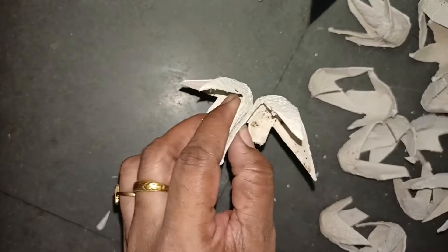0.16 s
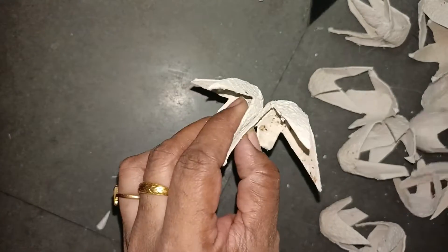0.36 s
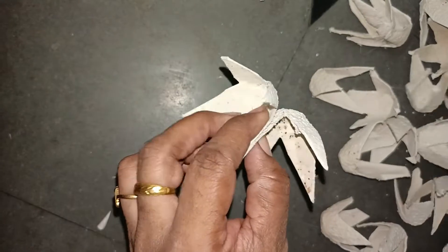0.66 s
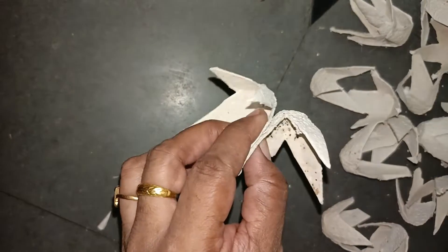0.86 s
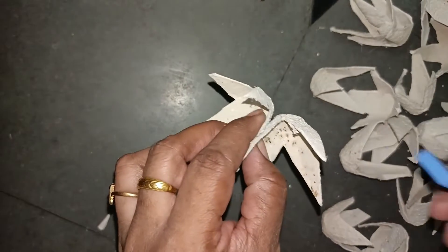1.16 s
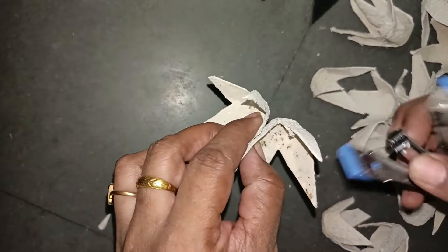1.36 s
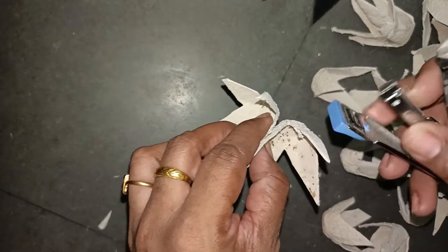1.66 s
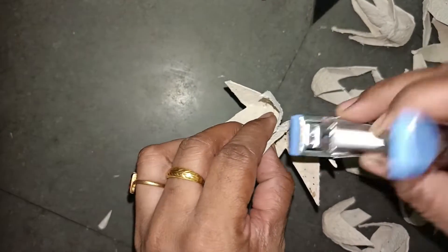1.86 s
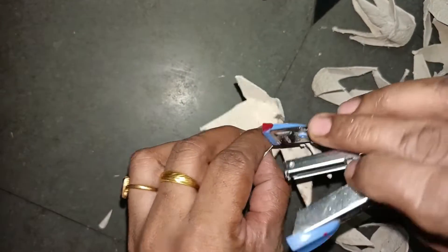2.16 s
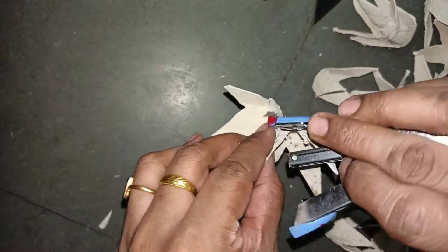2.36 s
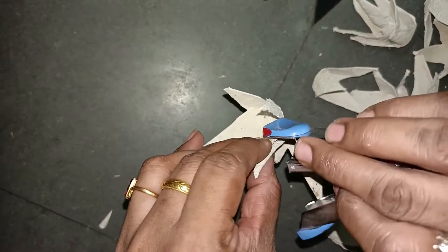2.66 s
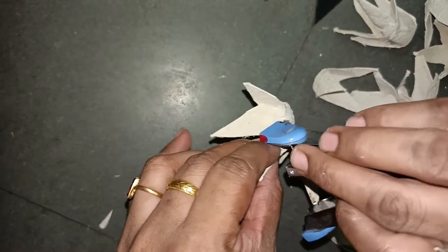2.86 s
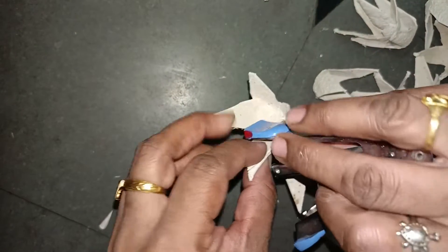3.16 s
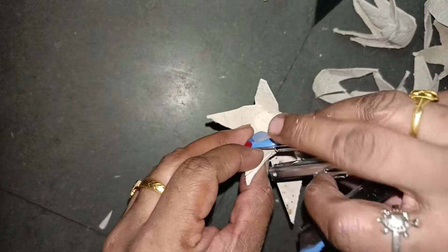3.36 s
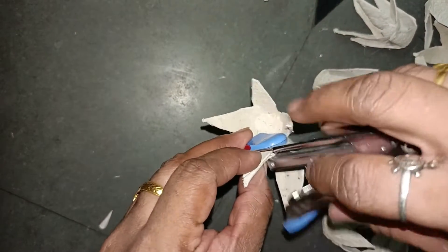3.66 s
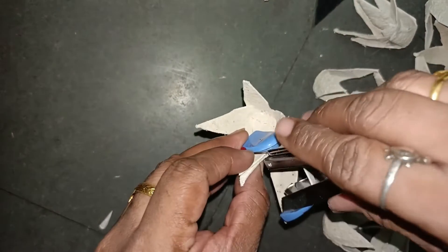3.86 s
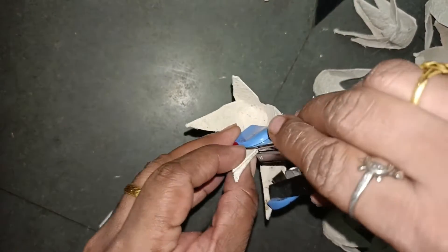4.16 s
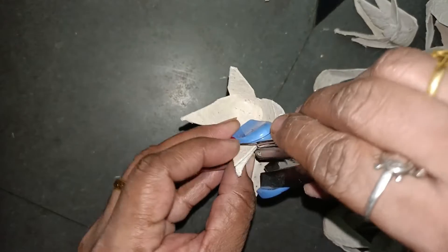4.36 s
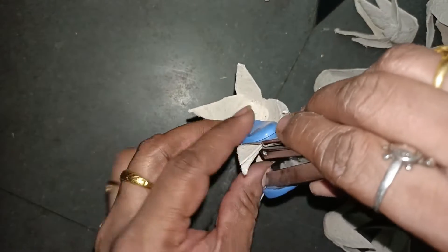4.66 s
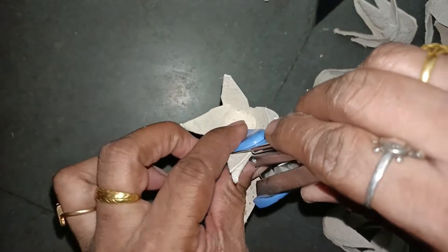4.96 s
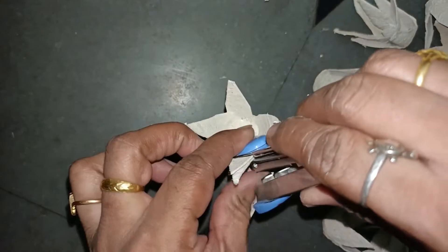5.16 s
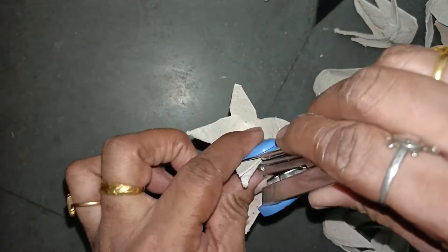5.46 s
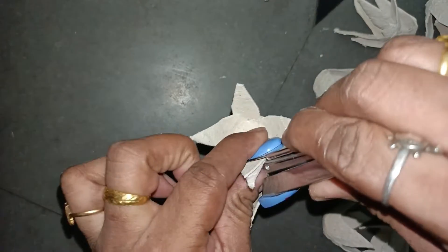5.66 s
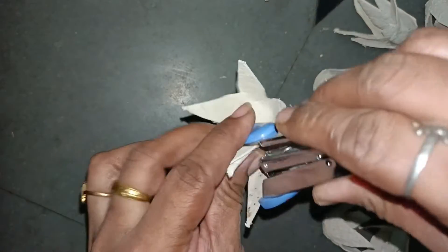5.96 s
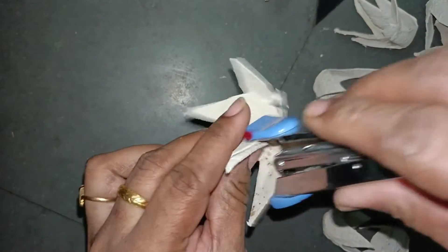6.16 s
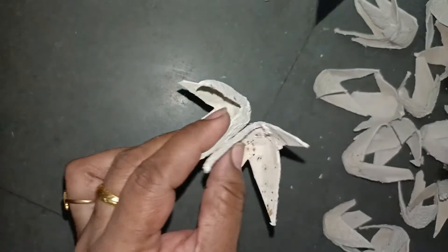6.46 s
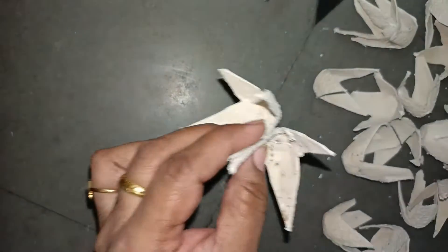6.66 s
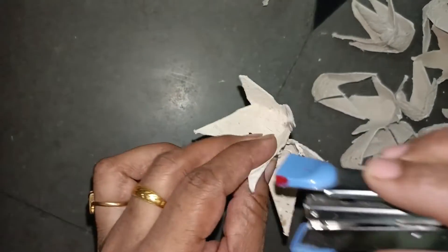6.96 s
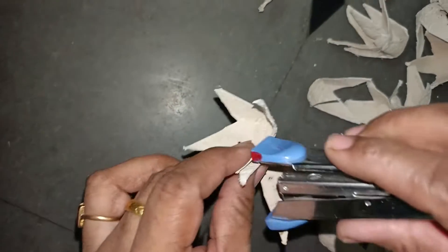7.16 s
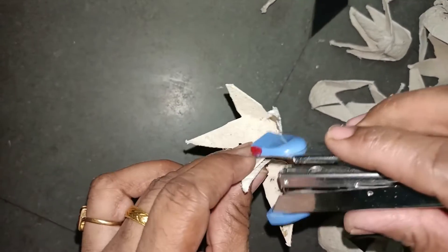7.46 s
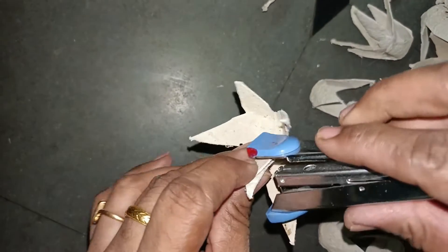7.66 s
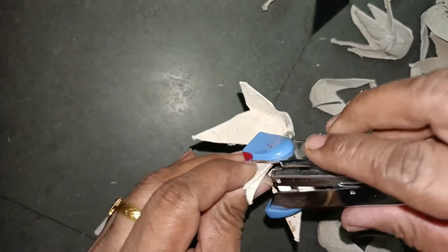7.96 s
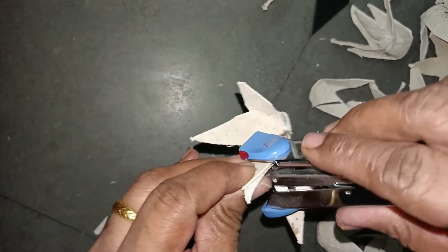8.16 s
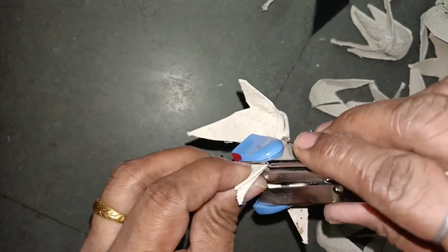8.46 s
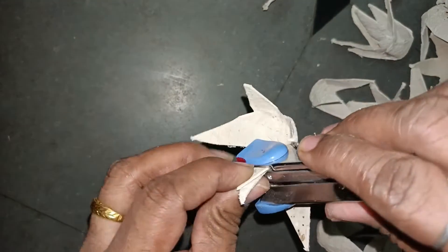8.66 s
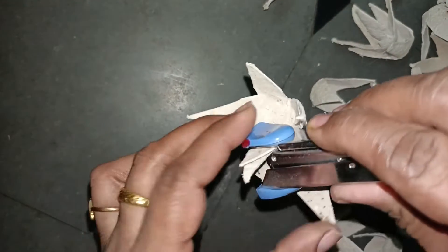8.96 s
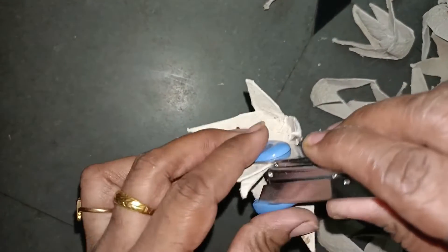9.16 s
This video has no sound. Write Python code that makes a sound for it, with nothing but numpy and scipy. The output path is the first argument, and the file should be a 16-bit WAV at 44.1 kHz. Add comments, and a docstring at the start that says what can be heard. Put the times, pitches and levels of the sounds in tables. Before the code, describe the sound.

Close up in a quiet indoor room, fingers handle dry paper-pulp pieces with soft, crisp rubs and tiny clicks. A hand stapler snaps open at the start, clinks as it is picked up, and later drives a single staple with a sharp metallic crack. Near the end its jaw slides over the pulp with a thin, bright hiss and clicks again. A far clock and a low appliance hum are barely audible behind.

```python
"""Dry paper-pulp petals are joined with a small metal hand stapler, close by in a quiet, hard room.
First the stapler springs open with a snap: steel strikes steel and the frame rings. Its loose parts rattle
as it is picked up and slid over the pulp. Near 5.5 s it drives a staple with one sharp crack, and from
about 7.5 s its jaw creeps on with a bright hiss. Throughout, fingers rub the pulp and its edges click,
while far off a clock ticks each second and an appliance hums."""
import sys
import numpy as np
from scipy import signal
from scipy.fft import rfft, irfft, next_fast_len
from scipy.io import wavfile
from scipy.ndimage import uniform_filter1d

SR = 44100
rng = np.random.default_rng(int(sys.argv[2]) if len(sys.argv) > 2 else 0)


def unload_audio(sound):
    """Save the sound as a 16-bit wav file, at the path given as the first command line argument."""
    columns = np.transpose(np.atleast_2d(sound))
    # keep every value between -1 and 1, then stretch to whole-number steps
    steps = np.round(np.clip(columns, -1, 1) * 32767)
    wavfile.write(sys.argv[1], SR, steps.astype(np.int16))


N = 410571
TIME = np.arange(N) / SR
BURST = np.arange(4096) / SR   # time axis of one impact, s


def spring_snap():
    """Release of stored elastic energy: the stapler springs open and its frame vibrates freely."""
    # Collisions within the snap. Each row: start in seconds, level in dB, 60 dB decay time in seconds.
    hits = [(.3261, -18, 0.016), (.3279, -22, 0.02), (.3305, -26.5, 0.042)]
    # Spectrum of the crack. Each row: frequency in Hz, gain in dB.
    spectrum = [(200, -40), (700, -29.5), (1250, -24), (2100, -31.5), (3300, -20.5), (4200, -13),
                (4900, -17), (5600, -12.5), (6200, -13.5), (6800, -3.5), (8300, 1.5), (9200, -3),
                (11000, -6), (12800, -10), (14300, -9), (15600, -5.5)]
    # Modes of the open frame. Each row: frequency in Hz, level in dB, t60 in seconds, balance in dB.
    modes = [(4200, -32.5, 0.033, -1), (6780, -19, 0.026, 20), (7970, -18, .024, 14),
             (8420, -33.5, 0.072, 3), (9650, -23, .019, -3), (10290, -26, .028, 4), (11830, -29, .022, 13),
             (14020, -23, .016, 11), (5650, -38, .05, 6)]
    return snap(hits, spectrum, modes, ring_s=.3262, pan_db=5.0, lead_s=.0007,
                crack_send_db=9.0, ring_send_db=-9.0)


def staple_crack():
    """Impact excitation: the staple is driven home, and the frame rings in its clamped modes."""
    # Collisions within the stroke. Each row: start in seconds, level in dB, t60 in seconds.
    hits = [(5.4728, -35, 0.014), (5.475, -17.5, 0.0091), (5.4762, -16.5, 0.011), (5.4777, -15.5, 0.016),
            (5.4795, -23.5, 0.023)]
    # Spectrum of the crack. Each row: frequency in Hz, gain in dB.
    spectrum = [(60, -36), (330, -17.5), (650, -21), (1050, -25.5), (1500, -15.5), (1950, -27),
                (2400, -20.5), (2850, -10.5), (4000, -12), (5600, -10.5), (6400, -8), (7300, -5),
                (8000, 0.5), (10200, .5), (10700, -8.5), (11400, -7), (15600, -12.5)]
    # Modes of the clamped frame. Each row: frequency in Hz, level in dB, t60 in seconds, balance in dB.
    modes = [(150, -58, .08, .5), (345, -53.5, .06, -4), (435, -54.5, .03, -2), (1480, -50, .025, -2),
             (2900, -37, .02, 16.5), (3090, -33.5, .016, 20), (3505, -32.5, .035, 16),
             (3950, -37, .025, 10), (5170, -32.5, .035, 8.5), (6360, -35.5, .035, 8), (7770, -27, .03, 4),
             (8420, -28, .025, 4), (9575, -22, 0.015, 2), (10090, -6, .012, -18), (11250, -30, .022, 4),
             (15300, -30, .025, 5)]
    return snap(hits, spectrum, modes, ring_s=5.4774, pan_db=5.5, lead_s=.00011,
                crack_send_db=2.5, ring_send_db=-6.0)


def snap(hits, spectrum, modes, ring_s, pan_db, lead_s, crack_send_db, ring_send_db):
    """Collisions add in power; the hardest excites damped modes. Returns direct and wall-bound sound."""
    crack, ring = np.zeros((2, N)), np.zeros((2, N))
    start = hits[0][0]
    power = sum(decay(np.maximum(BURST - s + start, 0), t60, db) ** 2 * (BURST >= s - start)
                for s, db, t60 in hits)
    burst = contact(np.sqrt(power) * stereo_noise(len(BURST), coherence=0.067), spectrum)
    add(crack, start, unit_rms(burst) * np.sqrt(power.mean()) * panned(pan_db), lead_s)
    vibration = sum(panned(pan) * decay(BURST, t60, db) * np.sin(2 * np.pi * hz * BURST)
                    for hz, db, t60, pan in modes)
    add(ring, ring_s, vibration * rise(BURST, 0.00022), lead_s)
    return crack + ring, from_db(crack_send_db) * crack + from_db(ring_send_db) * ring


def knocks_and_clicks():
    """Impulsive sources at the hands: loose steel parts collide and pulp edges catch."""
    # Steel knocks. Each row: start in seconds, level in dB, t60 in seconds, body and air gains in dB,
    # resonance of the struck part in Hz, its height in dB.
    knocks = [(1.1422, -49, .015, -7, 0, 8100, 9), (1.158, -55.5, .013, -9, -1, 8290, 3),
              (1.1985, -54, .013, -5, 7, 7000, 9), (1.211, -50, .014, -4, 2, 8000, 13),
              (1.2982, -44.5, .025, -9, 0, 8560, 5), (1.3313, -35.5, .011, -9, 0, 8900, 19),
              (1.338, -50, .014, -1, -6, 8400, 4), (1.3464, -40, 0.014, -2, -6, 8300, 7),
              (1.4118, -44.5, 0.008, -7, 0, 8800, 15), (1.4247, -53.5, .012, -12, -4, 8450, 7),
              (1.4604, -57.5, .02, -1, 1, 7810, 9), (1.555, -62.5, 0.015, 2, 4, 7610, 6),
              (1.668, -32.5, 0.012, -10, 0, 8700, 6), (1.9505, -46.5, .016, 1, -6, 8900, 10),
              (1.9636, -42, .017, 6, -6, 8600, 6), (1.992, -41, 0.029, -11, 5, 8850, 7),
              (2.0127, -42.5, .022, 2.5, 2, 7740, 12), (3.4343, -40.5, .023, -6, -2, 8950, 6),
              (3.4476, -42.5, 0.021, -1, -2, 8800, 5), (3.4947, -45.5, 0.014, -3, 0, 8010, 5),
              (6.8032, -42, 0.0055, -11, 6, 9030, 3), (6.805, -36.5, .004, -11, 7, 9030, 9),
              (8.5912, -46, .016, 6.5, 0, 8200, 7), (8.652, -49, .012, 11, -4, 9200, 4),
              (9.0794, -32.5, .014, -6, -7, 8420, 11)]
    # Pulp clicks. Each row: start in seconds, level in dB, t60 in seconds, body and air gains in dB.
    clicks = [(.0618, -46, 0.036, 3, 2), (.406, -48.5, 0.067, 12, -6), (0.5896, -43.5, 0.029, -13, -5),
              (.9105, -72, .015, -7.5, 3), (2.3326, -62, .02, 0, 2), (2.742, -49.5, 0.031, -7, -10),
              (2.7755, -51, .028, -13, -15), (2.8993, -60, .02, 21, -5), (2.9067, -63, .02, -4, -3),
              (3.107, -53.5, .03, -5, -2), (3.1745, -48.5, .046, -4, -4), (3.238, -45, .03, 2.5, -7),
              (3.247, -50, 0.017, -4, -7), (3.269, -50.5, 0.074, 2, -13), (3.367, -51, .018, 1, -3),
              (3.3847, -50, 0.011, 0, -3), (3.6448, -52.5, .025, 8.5, -7), (3.6794, -49.5, .03, 8, -2),
              (3.6865, -50.5, 0.044, 7, -2), (3.7066, -52, 0.016, -4, -4), (4.0418, -62.5, .03, 12, -5),
              (4.2291, -42.5, 0.015, 1, -4), (4.4658, -61.5, 0.021, -2, -4.5), (4.58, -54.5, 0.039, 7, -4),
              (4.93, -62, 0.016, 0, -3), (4.946, -62, .018, -6, -2), (4.963, -58.5, .018, -6, -4),
              (5.338, -52.5, 0.032, 6, 7), (5.609, -55, .015, -8.5, -10), (5.7512, -57.5, .02, -1, -13),
              (5.832, -52.5, .02, -5, -11), (5.858, -44.5, 0.03, 8.5, 1), (6.1549, -49, 0.052, 13.5, 0),
              (6.356, -62, .02, -2, -8), (6.3668, -58, 0.053, -4.5, -13), (6.7762, -50.5, .012, 4, 1),
              (6.7816, -50.5, .025, 0, -3), (6.7865, -49.5, .035, -2, -2), (6.8075, -39.5, 0.055, -8, 5),
              (7.1663, -55, .035, -13, -7), (7.3053, -54, 0.033, -9, -10), (7.592, -60, .025, -1, -3),
              (7.9, -61, .012, -2, -3), (8.3275, -58.5, .025, 12, -1), (9.0214, -44, .061, -6, 4),
              (9.224, -56.5, .02, -12, -6), (9.2632, -46.5, 0.05, -14, -2), (9.293, -45.5, 0.024, -16, -2)]
    out = np.zeros((2, N))
    for strike, rows in ((steel_knock, knocks), (pulp_click, clicks + chance_clicks())):
        for s, db, *timbre in rows:
            add_at_hands(out, s, strike(*timbre) * from_db(db))
    return out


def steel_knock(t60, body_db, air_db, ring_hz, ring_db, rebound_s=.002):
    """Elastic rebound: steel strikes, bounces and chatters, exciting the frame and the struck part."""
    # Resonances of the hand-held stapler. Each row: frequency in Hz, half width in Hz, height in dB.
    frame = [(3520, 160, 4), (4350, 260, 2.5), (5250, 170, 5), (6990, 170, 8), (7700, 90, 3),
             (10260, 190, 3.5), (13600, 280, 5)]
    size = len(BURST)
    force = grains(size, grain_db=1.5, coherence=0.5) * decay(BURST, t60) * rise(BURST, .0002)
    force[:, 0] += 1.9   # first touch
    force[:, int(rebound_s * rng.uniform(.7, 1.3) * SR)] += 1.3
    peaks_db = resonances(size, frame, vary_db=2.5, detune=0.021)
    peaks_db += peak(size, ring_hz, half_width_hz=190, db=ring_db)
    return impact(force, body_db, air_db, peaks_db)


def pulp_click(t60, body_db, air_db):
    """Transient excitation: a pulp edge catches with one impulse and a quickly damped chatter."""
    force = grains(len(BURST), grain_db=1.0, coherence=0.41) * decay(BURST, t60) * rise(BURST, 0.00039)
    force[:, 0] += 1.7   # first touch
    return impact(force, body_db, air_db)


def chance_clicks(per_s=1.7, level_db=-65, spread_db=3, t60=0.029, air_db=-4.0):
    """A random point process: pulp edges catch faintly by chance. Returns rows of pulp clicks."""
    draws = rng.random((int(per_s * N / SR), 3))
    return [(when * N / SR, level_db + spread_db * (2 * strength - 1), t60, 6 * (2 * body - 1), air_db)
            for when, strength, body in draws]


def impact(force, body_db, air_db, peaks_db=0):
    """Transient response: a brief blow is filtered into a click, with rms 1 over the first 5 ms."""
    # Spectrum of a click as heard, with the microphones' bright 8-9 kHz peak.
    # Each row: frequency in Hz, gain in dB.
    spectrum = [(200, -23.5), (1500, -22), (2500, -18.5), (3800, -10.5), (5600, -6.5), (7200, -2),
                (8600, 3), (9600, 1.5), (10600, -7.5), (13000, -8.5), (16000, -10)]
    edge_db = -2.0 + 0.37 * body_db   # the 5-6 kHz edge rises with the body
    sound = contact(force, spectrum, body_db, edge_db, air_db, ripple_db=4.5, peaks_db=peaks_db)
    return sound / np.sqrt(np.mean(sound[:, :SR // 200] ** 2))


def rubs(attack_s=.018, release_s=0.025, arch_db=3.5, spot_changes_per_s=22):
    """Sliding friction: each stroke presses hardest half way and wanders between two spots of pulp."""
    # Strokes of fingers and steel. Each row: start and length in seconds, level in dB,
    # body, edge and air gains in dB, brightest treble peak heard in Hz, crinkle from 0 to 1.
    strokes = [(0.04, 0.12, -60.5, 6, -4, -5, 8130, 0.7), (.181, 0.07, -53, -2, -8, -8, 8740, 0.36),
               (0.459, 0.079, -57.5, 6, -1, -1, 8120, 0.34), (.582, 0.032, -55, -5, -7, -3, 8890, .4),
               (0.705, 0.022, -60, -10, -7, -1, 9050, .4), (1.633, .031, -59, -4, 0, -2, 8550, .6),
               (1.715, 0.017, -63, -3, -1, -2, 8500, .3), (2.133, 0.03, -62.5, -2, 2, -3, 8500, 0.5),
               (2.207, .03, -53.5, -4, -9, -9, 7730, .3), (2.249, 0.038, -59.5, -3, -3, -4, 8250, .3),
               (2.43, 0.11, -56, -3, 1, -1.5, 8450, 0.3), (2.738, 0.05, -54.5, -7, 1, -10, 8020, .6),
               (2.864, .13, -58, -5, -2, -7, 9150, 0.6), (3.051, 0.033, -53.5, -8, 0, -2, 9540, .3),
               (3.108, 0.089, -52.5, -0.5, 3, -1, 7860, 0.66), (3.237, 0.068, -57.5, 7.5, 6, -6, 8300, 0.8),
               (3.349, 0.055, -50, -7, 4, -2, 7800, .7), (4.129, 0.058, -63, 1, -3, -1, 8720, .4),
               (4.206, .054, -50, 4.5, -5, -2, 7840, 0.2), (4.58, .12, -56, 6.5, 3.5, -1.5, 8040, 0.44),
               (4.715, 0.044, -49.5, 0, -3, 1.5, 8690, 0.2), (4.772, 0.045, -56, 8, 2.5, -1, 8600, 0.66),
               (4.933, .073, -68, 2, 5, -1, 8300, .9), (5.132, 0.053, -54, 10, 1, -4, 7990, 0.57),
               (5.256, 0.022, -59, 5, 7, -3, 8400, .3), (5.382, 0.048, -56.5, 2.5, -5, -2, 8470, 0.3),
               (5.848, 0.035, -53.5, 4, -5, -5, 9390, .6), (5.916, 0.038, -55, 0.5, 0, 1, 8100, .3),
               (6.065, .17, -54, 3.5, 0.5, -2, 8640, 0.25), (6.508, 0.06, -60, -5, -13, -7, 7960, .4),
               (6.687, 0.045, -51.5, 1, 2, -1.5, 8400, .5), (6.866, 0.02, -52.5, -7, -2.5, 0, 8170, .5),
               (6.913, 0.015, -52, -9, -15, -5, 9000, 0.4), (6.972, .062, -55, -6, -4, -4, 8290, 0.25),
               (7.154, 0.033, -54.5, -7, -11, -11, 8400, .6), (7.198, .085, -59, 5, 1, -4, 8860, 0.35),
               (7.661, .16, -59, -5.5, -0.5, -1, 9080, 0.54),
               (7.927, .046, -56.5, 6.5, 0.5, -4, 8870, 0.23), (8.144, 0.062, -54, 5, 3.5, -3, 8900, 0.13),
               (8.254, 0.027, -62, 12, 3, -3, 8700, .4), (8.712, 0.077, -48.5, -8, -6.5, -5, 9030, 0.4),
               (8.885, 0.02, -48, -5.5, -1.5, -4, 7600, 0.54), (9.028, .02, -58, -7, -4, 6, 9080, .7),
               (9.066, .02, -51.5, 3, 0, -5, 8340, 0.6), (9.267, 0.033, -51, -5, -11, -4, 9070, .5)]
    out, size = np.zeros((2, N)), 16384
    t = np.arange(size) / SR - attack_s
    for s, length, db, *timbre, crinkle in strokes:
        pressure_db = np.interp(t, [-attack_s, 0, length / 2, length, length + release_s, t[-1]],
                                [-30, -arch_db, 0, -arch_db, -22, -90])
        here, there = (scrape(friction(size, crinkle), *timbre) for _ in range(2))
        angle = np.pi / 2 * wander(size, SR / spot_changes_per_s)
        sound = np.cos(angle) * here + np.sin(angle) * there
        add_at_hands(out, s - attack_s, sound * from_db(db + pressure_db))
    return out


def friction(size, crinkle, catches_per_s=130, catch_t60=0.027, catch_db=7.5):
    """Stick-slip force: the share crinkle of its power comes in bursts as fibres catch and give way."""
    catches = (rng.random(size) < catches_per_s / SR) * from_db(catch_db * rng.uniform(-1, 1, size)) ** 2
    power_kept = decay(1 / SR, catch_t60) ** 2   # from one sample to the next
    bursts = signal.lfilter([1], [1, -power_kept], catches + 1e-18)
    power = 1 - crinkle + crinkle * bursts / bursts.mean()
    return grains(size, grain_db=4.5, coherence=0.37) * np.sqrt(power)


def scrape(force, body_db, edge_db, air_db, peak_hz):
    """Resonant filtering of friction by the pulp; peak_hz is the brightest treble peak heard. Rms 1."""
    # Resonances of the petals. Each row: frequency in Hz, half width in Hz, height in dB.
    petal = [(2400, 150, 2.5), (3830, 220, 2.9), (5130, 200, 2.5), (5950, 220, 2.5), (7040, 150, 2),
             (9450, 260, 2), (10800, 180, 3)]
    # Spectrum of a rub as heard, with the microphones' bright 8-9 kHz peak.
    # Each row: frequency in Hz, gain in dB.
    spectrum = [(200, -22), (1500, -20.5), (2500, -18), (3700, -12.5), (4800, -7.5), (5600, -7), (7000, -4),
                (8200, 1), (9200, 0.5), (10500, -6), (12500, -9.5), (16000, -12)]
    size = force.shape[1]
    peaks_db = resonances(size, petal, vary_db=3.5, detune=.035)
    peaks_db += peak(size, peak_hz, half_width_hz=260, db=5.5)
    return unit_rms(contact(force, spectrum, body_db, edge_db, air_db, ripple_db=4.5, peaks_db=peaks_db))


def finger_hiss(cracks_per_s=30, crack_db=21):
    """Frictional creep: skin on pulp gives a faint, uneven hiss, and now and then a fibre cracks."""
    # The hiss follows the firmness of the grip. Each row: time in seconds, level in dB.
    grip = [(0, -57), (.3, -68), (.6, -63), (.95, -81.5), (1.3, -68.5), (1.55, -80), (1.85, -67),
            (2.05, -71), (2.65, -77), (3.0, -65.5), (3.6, -73.5), (4.1, -76), (4.24, -69), (4.45, -80.5),
            (5.1, -66.5), (5.68, -74.5), (5.82, -64), (6.6, -77.5), (7.1, -64.5), (7.38, -88),
            (7.44, -65.5), (7.7, -63.5), (8.1, -67.5), (8.7, -63), (9.31, -66.5)]
    # Spectrum of the hiss as heard, with the microphones' bright 8-9 kHz peak.
    # Each row: frequency in Hz, gain in dB.
    spectrum = [(200, -15.5), (2000, -17), (4000, -13), (6500, -9.5), (8500, 2), (9400, -1.5),
                (10500, -9.5), (12300, -11.5), (15500, -13)]
    creep = grains(N, grain_db=2.0, coherence=.15) * from_db(3.35 * wander(N, SR / 35))
    cracks = (rng.random(N) < cracks_per_s / SR) * rng.uniform(-1, 1, (2, N)) * from_db(crack_db)
    hiss = coloured(creep + cracks, spectrum) * from_db(np.interp(TIME, *np.transpose(grip)))
    out = np.zeros((2, N))
    add(out, 0, hiss * panned(1.6), lead_s=.0003)
    return out


def jaw_hiss():
    """Roughness noise: the steel jaw creeps over the pulp with a fine, very bright hiss."""
    # Course of the slide. Each row: time in seconds, level in dB.
    slide = [(7.45, -86), (7.66, -66), (7.95, -73), (8.1, -77), (8.35, -68), (8.8, -66), (9.1, -78),
             (9.31, -67)]
    # Spectrum of the hiss as heard. Each row: frequency in Hz, gain in dB.
    spectrum = [(200, -30), (5000, -19), (8500, -2), (11000, -1), (15500, -1)]
    level_db = np.interp(TIME, *np.transpose(slide), left=-120)
    return from_db(level_db) * coloured(grains(N, grain_db=2.0, coherence=.3), spectrum)


def bumps_and_scuffs():
    """Slow forces excite low frequencies: hands lean and lift dully. Faint scuffs sound further off."""
    # Shifts of weight on the surface. Each row: centre and half width in seconds, level in dB.
    bumps = [(.75, .14, -75.5), (2.6, .12, -79), (6.878, .04, -74), (7.359, .046, -76), (7.74, 0.13, -71),
             (8.45, .18, -74), (8.9, 0.11, -68.5)]
    # Spectrum of a bump. Each row: frequency in Hz, gain in dB.
    bump_spectrum = [(25, -10), (60, -2), (120, 7), (220, -1.5), (380, -16), (800, -34), (3000, -70)]
    # Distant scuffs. Each row: centre and half width in seconds, level in dB.
    scuffs = [(.46, 0.074, -71), (.62, 0.056, -73.5), (2.13, .07, -73), (3.2, .11, -72)]
    # Spectrum of a scuff. Each row: frequency in Hz, gain in dB.
    scuff_spectrum = [(200, -17), (650, 0.5), (1050, -8), (1480, 2.5), (2100, -8), (5000, -25),
                      (16000, -45)]
    return swells(bumps, bump_spectrum, coherence=.91) + swells(scuffs, scuff_spectrum, coherence=.1)


def swells(rows, spectrum, coherence):
    """Amplitude modulation: Gaussian envelopes shape coloured noise into soft swells."""
    envelope = sum(from_db(db) * np.exp(-((TIME - s) / width) ** 2) for s, width, db in rows)
    return envelope * coloured(stereo_noise(N, coherence), spectrum)


def room(x, first_echo_s=0.0056, build_s=0.0048):
    """Reverberation: diffuse echoes from hard walls build up and decay, the treble soonest."""
    # Spectrum of the echoes. Each row: frequency in Hz, gain in dB.
    spectrum = [(200, -3), (1200, 2), (3000, 3.5), (6000, -1.5), (8500, -4.5), (10200, -2.5), (13000, -1),
                (16000, -3)]
    # Reverberation time. Each row: frequency in Hz, t60 in seconds.
    t60s = [(200, 0.38), (3000, 0.35), (8500, 0.27), (16000, 0.22)]
    t = np.arange(SR * 3 // 4) / SR
    centres = np.geomspace(200, 16000, 12)
    white, tail = rfft(rng.standard_normal((2, len(t)))), 0
    for hz, share in zip(centres, np.eye(len(centres))):
        band = irfft(white * np.interp(bins(len(t)), centres, share), len(t))
        tail = tail + band * decay(t, at_hz(t60s, hz), at_hz(spectrum, hz))
    onset = rise(np.maximum(t - first_echo_s, 0), build_s)
    response = unit_rms(tail * onset) / np.sqrt(len(t))   # unit energy
    return signal.fftconvolve(x, response, axes=1)[:, :N]


def clock(first_tick_s=.235, level_db=-65, rise_s=0.04, t60=0.34):
    """Diffuse field: each second a far clock's tick arrives only as a reverberant swell of noise."""
    # Spectrum of a tick. Each row: frequency in Hz, gain in dB.
    spectrum = [(200, -18), (700, 2.5), (1200, -5), (2200, -1), (3200, -8.5), (5000, -10), (9000, -15),
                (16000, -29)]
    age = (TIME - first_tick_s) % 1
    swell = rise(age, rise_s) * decay(age, t60)
    return from_db(level_db) * swell / swell.max() * coloured(rng.standard_normal((2, N)), spectrum)


def room_rumble(level_db=-70):
    """Spatial coherence: the long waves of the room's noise reach both microphones nearly alike."""
    # Likeness of the two sides. Each row: frequency in Hz, left-right correlation.
    correlation = [(50, 0.84), (250, 0.63), (600, 0), (1500, 0), (16000, 0)]
    # Spectrum of the ambient noise. Each row: frequency in Hz, gain in dB.
    spectrum = [(20, -29), (42, -24), (57, -5.5), (78, -11), (115, 4), (160, -1.5), (260, -6), (320, -3),
                (500, -10), (950, -9.5), (1500, -14.5), (3000, -21), (6000, -22.5), (8700, -17.5),
                (12000, -27), (16000, -30.5)]
    size = next_fast_len(N)
    coherence = at_hz(correlation, bins(size))
    mid, side = rfft(rng.standard_normal((2, size)))
    noise = irfft(np.sqrt(1 + coherence) * mid + np.sqrt(1 - coherence) * side * [[1], [-1]], size)
    return from_db(level_db) * coloured(noise[:, :N], spectrum)


def appliance_hum(waver_rad=.9, swell_db=5.0, wavers_per_s=13):
    """Random modulation: each tone of an appliance's hum wavers in phase and strength."""
    # Tones of the hum. Each row: frequency in Hz, level in dB, left-right balance in dB.
    tones = [(58, -86.5, .5), (205, -88.5, 0), (304.6, -83.5, -4), (320.4, -79.5, -10.5), (421, -88, -13),
             (616, -90, 9), (830, -90.5, 11.5), (917, -94, -1.5), (934, -88.5, -1.5)]
    hum = np.zeros((2, N))
    for hz, db, pan in tones:
        phase = waver_rad * wander(N, SR / wavers_per_s)
        swell = from_db(swell_db * wander(N, SR / wavers_per_s))
        hum += panned(pan) * from_db(db) * unit_rms(swell * np.sin(2 * np.pi * hz * TIME + phase))
    return hum


def contact(force, spectrum, body_db=0, edge_db=0, air_db=0, ripple_db=0, peaks_db=0):
    """Source and filter: the force is whitened, then given the colour heard from this contact."""
    size = force.shape[1]
    hz = bins(size)
    # body is the range below 4.3 kHz, edge 4.9-6.4 kHz, air above 11.5 kHz
    tilt_db = np.interp(hz, [4300, 4900, 6400, 7500, 9800, 11500],
                        [body_db, edge_db, edge_db, 0, 0, air_db])
    fine_db = ripple_db * wander(len(hz), size / 400)   # fine resonances
    return minimum_phase(whiten(force), at_hz(spectrum, hz) + tilt_db + fine_db + peaks_db)


def resonances(size, table, vary_db, detune):
    """Loading: fingers damp and detune an object's resonances anew at each contact; gain in dB."""
    draws = rng.standard_normal((len(table), 2))
    return sum(peak(size, hz * (1 + detune * shift), width, db + vary_db * lift)
               for (hz, width, db), (lift, shift) in zip(table, draws))


def peak(size, hz, half_width_hz, db):
    """Resonance: a bell-shaped gain curve in dB."""
    return db / (1 + ((bins(size) - hz) / half_width_hz) ** 2)


def grains(size, grain_db, coherence):
    """Microscopic stick-slip: dense, tiny impulses of uneven strength; rms 1."""
    return unit_rms(stereo_noise(size, coherence) * from_db(grain_db * wander(size, SR / 1500)))


def stereo_noise(size, coherence):
    """Partial coherence: only a share of an extended source's noise is common to both microphones."""
    common = np.sqrt(coherence) * rng.standard_normal(size)
    return common + np.sqrt(1 - coherence) * rng.standard_normal((2, size))


def add_at_hands(out, s, sound):
    """Level and time cues: the further left the hands, the more the left side leads in both."""
    # Where the hands work. Each row: time in seconds, left-right balance in dB.
    path = [(0, 7), (.6, 4), (1.2, 5.5), (2.0, 6), (2.8, 2), (4.2, 1.5), (5.9, 2), (6.8, 7), (7.8, 4),
            (9.31, 2)]
    pan_db = np.interp(s, *np.transpose(path))
    add(out, s, sound * panned(pan_db), lead_s=.0003 + .00003 * pan_db)


def add(out, s, sound, lead_s):
    """Path difference: a sound mixed in at time s reaches the right microphone lead_s later."""
    for channel, lag in enumerate((0, round(lead_s * SR))):
        i = int(np.clip(s * SR + lag, 0, N - 1))
        out[channel, i:i + sound.shape[1]] += sound[channel, :N - i]


def microphones(x):
    """Frequency response: each microphone colours the treble of close sounds in its own way."""
    # Treble balance. Each row: frequency in Hz, left minus right in dB.
    balance = [(2000, 0), (5000, 0.5), (7000, 1.5), (8100, 2), (9100, -4.5), (10000, -3), (12000, 0),
               (15500, 0)]
    size = next_fast_len(N)
    gains = from_db(np.array([[.5], [-.5]]) * at_hz(balance, bins(size)))
    return irfft(rfft(x, size) * gains, size)[:, :N]


def whiten(x):
    """Inverse filtering: flatten the broad humps in the spectrum of a random burst."""
    power = uniform_filter1d(np.mean(np.abs(rfft(x)) ** 2, axis=0), size=x.shape[1] // 128)
    return minimum_phase(x, -10 * np.log10(power / power.mean() + 1e-9))


def minimum_phase(x, gain_db):
    """Causality: filter with the minimum phase of a gain curve, so that nothing sounds early."""
    size = x.shape[-1]
    cepstrum = irfft(np.log(from_db(gain_db)), size)
    cepstrum[..., 1:size // 2] *= 2
    cepstrum[..., size // 2 + 1:] = 0
    return irfft(rfft(x) * np.exp(rfft(cepstrum)), size)


def coloured(x, spectrum):
    """Spectral shaping with zero phase; rms 1."""
    size = next_fast_len(N)
    return unit_rms(irfft(rfft(x, size) * from_db(at_hz(spectrum, bins(size))), size)[..., :N])


def wander(size, step):
    """Slow noise: a random curve of spread about 1 that turns every step points."""
    return np.interp(np.arange(size) / step, np.arange(size + 1), rng.standard_normal(size + 1))


def decay(t, t60, start_db=0):
    """Exponential damping: the amplitude falls 60 dB in t60 seconds."""
    return from_db(start_db - 60 * t / t60)


def rise(t, rise_s):
    """First-order build-up from 0 towards 1."""
    return 1 - np.exp(-t / rise_s)


def panned(pan_db):
    """Constant-power gains, the left pan_db above the right."""
    return unit_rms(from_db(np.array([[.5], [-.5]]) * pan_db))


def at_hz(points, hz):
    """Interpolation on a logarithmic frequency axis."""
    frequencies, values = np.transpose(points)
    return np.interp(np.log(hz), np.log(frequencies), values)


def bins(size):
    return np.maximum(np.fft.rfftfreq(size, 1 / SR), 1)


def from_db(db):
    return 10 ** (np.asarray(db) / 20)


def unit_rms(x):
    return x / np.sqrt(np.mean(x ** 2) + 1e-20)


def scene(handling_send_db=-1.5, room_db=-15.5):
    """Superposition: the direct sound of stapler and hands, its echoes, and the background."""
    spring, spring_to_walls = spring_snap()
    staple, staple_to_walls = staple_crack()
    handling = microphones(knocks_and_clicks() + rubs() + finger_hiss() + jaw_hiss())
    to_walls = spring_to_walls + staple_to_walls + from_db(handling_send_db) * handling
    # the walls mix both sides
    echoes = from_db(room_db) * (room(to_walls) + room(to_walls[::-1])) / np.sqrt(2)
    background = bumps_and_scuffs() + clock() + room_rumble() + appliance_hum()
    return spring + staple + handling + echoes + background


def record(dry, cutoff_hz=15600):
    """Band limiting: a steep elliptic low-pass removes the highest treble."""
    return signal.sosfilt(signal.ellip(10, .2, 70, cutoff_hz, fs=SR, output="sos"), dry)


dry = scene()
out = record(dry)
unload_audio(out)
```